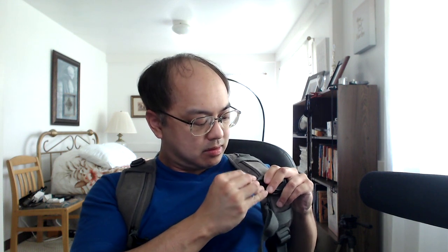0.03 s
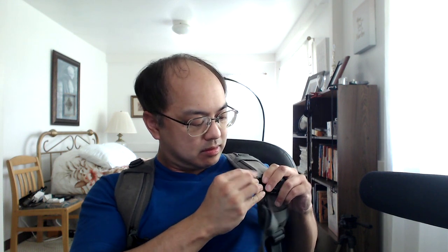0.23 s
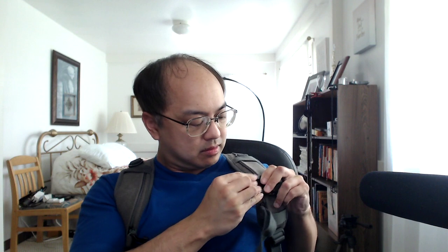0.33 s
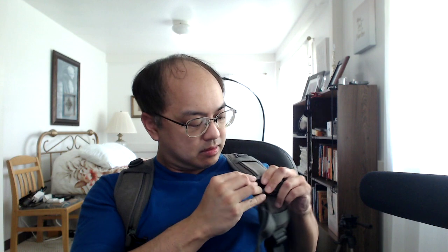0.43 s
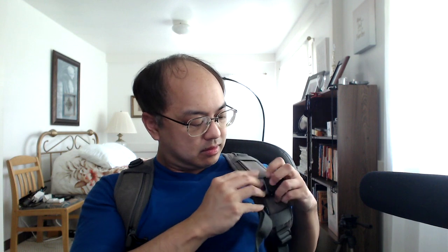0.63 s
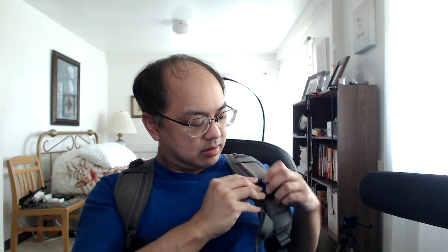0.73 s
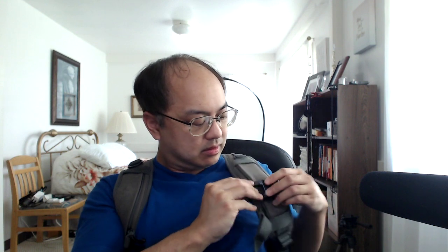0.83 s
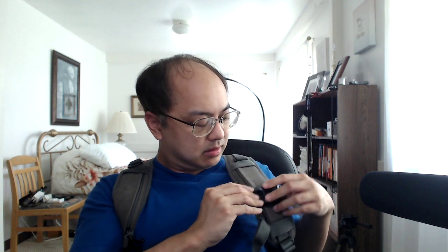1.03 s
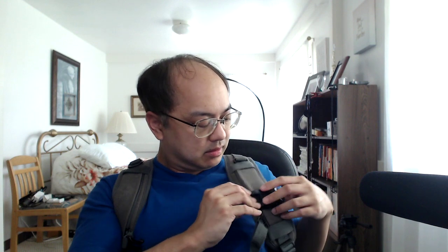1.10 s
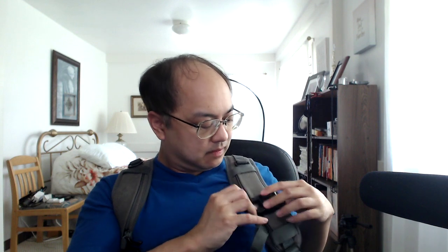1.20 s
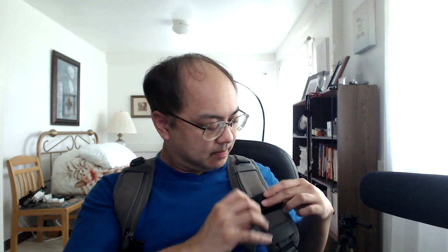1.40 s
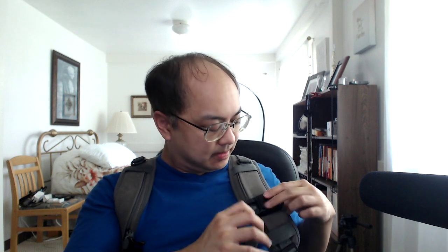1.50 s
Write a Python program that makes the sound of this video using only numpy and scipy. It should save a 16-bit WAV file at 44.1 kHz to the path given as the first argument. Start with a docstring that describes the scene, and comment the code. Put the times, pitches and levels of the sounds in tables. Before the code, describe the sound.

A plastic buckle on a backpack strap snaps shut with one sharp, loud click close to the microphone. Fingers then faintly rub, bump and tick against the strap in a small quiet room with a low hum.

```python
"""A plastic buckle on a backpack's shoulder strap snaps shut, close up, in a small quiet bedroom.
Its prongs slide, spring free and slap into their seats: five tight hits of crack, ring and thump
that overload the microphone and leave a short room tail. Fingers rub the webbing, bump the padded
strap and tick against the plastic, mostly after the snap. A low hum and soft hiss lie underneath."""
import sys
import numpy as np
from scipy import signal
from scipy.fft import rfft, irfft
from scipy.io import wavfile

SR = 44100
rng = np.random.default_rng(int(sys.argv[2]) if len(sys.argv) > 2 else 0)


def dump(signal):
    """Clip the signal to [-1, 1] and save it as 16-bit WAV at the path in sys.argv[1]."""
    limited = np.clip(np.atleast_2d(signal).T, -1, 1)
    pcm = np.round(limited * 32767).astype(np.int16)
    wavfile.write(sys.argv[1], SR, pcm)


N = 68355
T = np.arange(N) / SR

# level ride of the hum: t/s, level/dB
HUM_RIDE = [(0, -44), (.03, -49), (.07, -44.5), (.16, -47.5), (.28, -47), (.36, -42.5), (.46, -51.5),
            (.51, -43.5), (.57, -44.5), (.66, -48.5), (1.55, -47)]
# colour of the room tone's hiss: f/Hz, relative level/dB
AIR_COLOUR = [(20, 10), (55, 3), (140, 0.5), (260, -0.5), (450, -10.5), (700, -9), (1100, -13.5),
              (2000, -18.5), (5000, -22), (10000, -27.5), (15500, -34), (17000, -38)]
# the bedroom's decay times: f/Hz, t60/s
ROOM_DECAY = [(100, 0.84), (300, 0.32), (700, 0.22), (1800, 0.27), (4800, 0.26), (9000, 0.21),
              (15000, 0.21)]
# colour of the snap as it comes back from the walls: f/Hz, relative level/dB
WASH_COLOUR = [(60, -15), (140, 6.5), (250, 4), (420, 15.5), (700, 10), (1100, -0.5), (1400, 1), (2000, 4),
               (2900, 2.5), (3500, -2.5), (4500, 3.5), (5600, -4), (9200, 0.5), (11000, -3.5),
               (12300, -11.5), (15500, -10)]
# standing waves set off by the snap: f/Hz, level/dB, t60/s
STANDING_WAVES = [(143.7, -28, 0.24), (214.4, -36.5, 0.25), (276.7, -42.5, 0.46), (321, -39.5, 0.27),
                  (390, -31.5, 0.32), (479, -30.5, 0.11), (613, -37.5, 0.23), (963, -32, 0.13),
                  (1172, -37.5, 0.17), (1775, -39.5, 0.19), (1955, -42.5, 0.22), (2176, -39.5, .16),
                  (2910, -36.5, .12)]
# finger strokes on the webbing: peak t/s, rub level/dB, hiss level/dB, rise/s, fall/s
WEBBING_STROKES = [(0.029, -62, -66.5, 0.0087, 0.012), (.465, -65, -70, 0.023, 0.027),
                   (0.549, -60, -64.5, 0.032, 0.01), (0.59, -55.5, -60.5, 0.015, 0.02),
                   (0.721, -60, -66.5, 0.021, 0.03), (.80, -62, -71, 0.024, 0.026),
                   (0.875, -56.5, -63.5, 0.025, 0.012), (.95, -66.5, -72.5, 0.034, 0.034),
                   (1.14, -69.5, -69.5, 0.051, 0.067), (1.246, -70, -67.5, 0.043, 0.033),
                   (1.351, -68, -65.5, 0.018, 0.03), (1.47, -66.5, -79, 0.097, 0.13)]
# colour of a stroke's dull rub: f/Hz, relative level/dB
RUB_COLOUR = [(200, -0.5), (650, 7.5), (1100, -1), (1800, 6), (3200, -2), (5000, -7), (9000, -22.5),
              (16000, -44)]
# colour of a stroke's nylon hiss: f/Hz, relative level/dB
NYLON_COLOUR = [(1000, -22), (2500, -7.5), (4500, 2), (7000, -1.5), (10500, -2.5), (13000, -9),
                (16000, -10.5)]
# the weave catches and lets go: t/s, level/dB, f/Hz
WEAVE_CATCHES = [(0.617, -49, 3840), (0.6217, -52, 3800), (0.802, -55.5, 1650), (1.462, -60, 4340)]
# finger knocks on the padded strap: t/s, knock level/dB, f/Hz, t60/s, scuff level/dB
STRAP_BUMPS = [(.319, -44, 745, 0.025, -62), (.342, -45, 623, 0.042, -50), (0.4305, -39.5, 540, 0.015, -57),
               (.4357, -37, 669, 0.05, -44), (0.4417, -42, 660, 0.02, -49.5),
               (0.445, -27.5, 484, 0.011, -58), (.602, -41, 676, 0.02, -75), (1.281, -48, 503, 0.022, -60),
               (1.315, -42.5, 452, 0.027, -52), (1.329, -43, 550, 0.023, -52),
               (1.343, -41.5, 200, 0.033, -74.5), (1.4478, -39, 318, 0.024, -81),
               (1.4518, -28.5, 376, 0.018, -43.5), (1.483, -31, 316, 0.01, -53),
               (1.489, -29, 191, 0.033, -57), (1.502, -39.5, 342, 0.045, -63),
               (1.516, -36.5, 175, 0.031, -54), (1.533, -42.5, 280, 0.019, -65)]
# colour of a knock's scuff: f/Hz, relative level/dB
SCUFF_COLOUR = [(300, 6), (750, 4.5), (1300, 0.5), (2000, -2), (4000, -13.5), (8000, -24), (16000, -42)]
# fingernails and loose plastic tick against the buckle, and the prongs tick as they start to slide: t/s,
# level/dB, f/Hz
PLASTIC_TICKS = [(0.051, -41.5, 11100), (0.1755, -41.5, 5974), (0.1946, -30.5, 6300), (0.6044, -52, 3330),
                 (.7203, -41, 10500), (0.7297, -33, 3700), (0.7377, -42, 10000), (0.7377, -41, 4220),
                 (0.773, -47, 7000), (.9197, -49, 15000), (.9388, -48, 14500), (0.973, -43, 12500),
                 (1.139, -45, 4320), (1.3165, -51.5, 1750), (1.4514, -37, 1560), (1.4514, -45.5, 3600)]
# the prongs' hits: t/s, ring level/dB, tilt/(dB per octave), thump level/dB, thump f/Hz
PRONG_HITS = [(.19925, -12.7, -.6, -10.4, 887), (.20057, -.2, -1.4, .8, 611),
              (.20122, -6.3, -1.9, 4.5, 553), (.20513, 2, .8, -14.6, 939), (.20551, -6.2, -3.8, -9.1, 536)]
# the buckle's ringing modes: f/Hz, relative level/dB, t60/s
BUCKLE_MODES = [(1030, -3, 0.0047), (1577, -13, 0.0065), (1930, -7, 0.0084), (2304, -10, .0081),
                (2956, -11.5, 0.0053), (3720, -16, .008), (4090, -7, 0.0059), (6660, -15, .006),
                (8605, -9, .0042), (9390, -10.5, .0051), (10960, -10.5, .0036), (15327, -17, 0.004)]
# colour of a hit's crack: f/Hz, relative level/dB
CRACK_COLOUR = [(500, -30.5), (1400, 5.5), (2000, 4.5), (5600, -13), (9200, -0.5), (11000, -8.5),
                (12500, -17), (15500, -18)]


def from_db(db):
    """Decibels to gain."""
    return 10 ** (np.asarray(db) / 20)


def unit_rms(x):
    """Normalise to an rms of 1."""
    return x / np.sqrt(np.mean(x ** 2) + 1e-20)


def at_hz(curve, hz):
    """Read a curve on a log-frequency axis."""
    freqs, values = np.transpose(curve)
    return np.interp(np.log(np.maximum(hz, 1)), np.log(freqs), values)


def coloured(x, colour):
    """EQ a steady noise to a colour, at unit rms."""
    gain = from_db(at_hz(colour, np.fft.rfftfreq(N, 1 / SR)))
    return unit_rms(irfft(rfft(x) * gain, N))


def noise(colour):
    """Smooth noise of a given colour."""
    return coloured(rng.standard_normal(N), colour)


def burst(start, decay_s):
    """Envelope with an instant attack and an exponential decay."""
    return (T >= start) * np.exp(-np.maximum(T - start, 0) / decay_s)


def ring(start, hz, t60):
    """One struck mode: a decaying sine."""
    return burst(start, t60 / np.log(1000)) * np.sin(2 * np.pi * hz * (T - start))


def room_tone(hum_hz=89.8, upper_hz=144, fade_s=0.17):
    """The bed: a wavering low hum, a faint tone that fades in above it, and soft hiss."""
    phase = rng.uniform(0, 2 * np.pi, 2)
    ride = from_db(np.interp(T, *np.transpose(HUM_RIDE)))
    hum = ride * np.sin(2 * np.pi * hum_hz * T + phase[0])
    late_fade_in = np.clip(T / fade_s - 1, 0, 1)
    upper = from_db(-65) * late_fade_in * np.sin(2 * np.pi * upper_hz * T + phase[1])
    return np.sqrt(2) * (hum + upper) + from_db(-59) * noise(AIR_COLOUR)


def room_decay(x, start):
    """Shape a noise into a tail, each band dying away at the room's pace."""
    hz, spectrum = np.fft.rfftfreq(N, 1 / SR), rfft(x)
    edges = np.geomspace(40, 20000, 13)
    tail = np.zeros(N)
    for lo, hi in zip(edges, edges[1:]):
        band = irfft(spectrum * ((hz >= lo) & (hz < hi)), N)
        t60 = at_hz(ROOM_DECAY, np.sqrt(lo * hi))
        tail += band * burst(start, t60 / np.log(1000))
    return tail


def bedroom_reverb(x, wet_db=-12, predelay_s=0.0033):
    """The walls return a short diffuse reverb; wet signal only."""
    impulse = room_decay(rng.standard_normal(N), predelay_s)
    impulse /= np.sqrt(np.sum(impulse ** 2))
    return from_db(wet_db) * signal.fftconvolve(x, impulse)[:N]


def snap_tail(attack_s=0.0029, early_delay_s=0.01):
    """The snap fills the room with an even wash and a few standing waves."""
    first_hit, last_hit = PRONG_HITS[0][0], PRONG_HITS[-1][0]
    wash = from_db(-25.5) * room_decay(noise(WASH_COLOUR), first_hit)
    wash *= 1 - burst(first_hit, attack_s)
    # the nearest surfaces answer first and lift the front of the wash
    wash *= 1 + from_db(0.5) * burst(first_hit + early_delay_s, decay_s=0.005)
    waves = sum(from_db(db) * ring(last_hit, hz, t60) for hz, db, t60 in STANDING_WAVES)
    return wash + waves * (1 - burst(last_hit, attack_s))


def fibre_friction(colour, slips_per_s=6000, spread_db=3.5, smooth_gain=0.7):
    """Grainy texture: many tiny fibre slips of uneven size over smooth friction noise."""
    slips = (rng.random(N) < slips_per_s / SR) * rng.choice([-1, 1], N)
    sizes = from_db(spread_db * np.minimum(rng.exponential(1, N), 4))
    return coloured(unit_rms(slips * sizes) + smooth_gain * rng.standard_normal(N), colour)


def webbing_rustle():
    """Each finger stroke swells and fades, part dull rub and part nylon hiss."""
    peak, rub_db, hiss_db, rise, fall = np.transpose(WEBBING_STROKES)[:, :, None]
    swells = np.exp(-((T - peak) / np.where(T < peak, rise, fall)) ** 2)
    out = np.zeros(N)
    for colour, db in ((RUB_COLOUR, rub_db), (NYLON_COLOUR, hiss_db)):
        power = np.sum(from_db(db) ** 2 * swells, axis=0)
        out += fibre_friction(colour) * np.sqrt(power)
    return out


def weave_catches(width_hz=2100, fade_s=0.0015):
    """The weave snags and lets go in short band-passed scratches."""
    out = np.zeros(N)
    radius = np.exp(-np.pi * width_hz / SR)
    for peak, db, hz in WEAVE_CATCHES:
        bandpass = [1, 0, -1, 1, -2 * radius * np.cos(2 * np.pi * hz / SR), radius * radius]
        scratch = signal.sosfilt([bandpass, bandpass], rng.standard_normal(N))
        out += from_db(db) * unit_rms(scratch) * np.exp(-np.abs(T - peak) / fade_s)
    return out


def strap_bumps(attack_s=0.00062):
    """Dull finger knocks with a little scuff; the padding gives way and softens the attack."""
    out, grit = np.zeros(N), noise(SCUFF_COLOUR)
    for start, knock_db, hz, t60, scuff_db in STRAP_BUMPS:
        scuff = from_db(scuff_db) * grit * burst(start, decay_s=0.0035)
        knock = from_db(knock_db) * ring(start, hz, t60) * (1 - burst(start, attack_s))
        out += scuff - knock
    return out


def plastic_ticks(cycles=6.4):
    """Nails, loose plastic and the sliding prongs tap the buckle: crisp ticks, gone within a few cycles."""
    return sum(from_db(db) * ring(start, hz, t60=cycles / hz) for start, db, hz in PLASTIC_TICKS)


def buckle_snap(tilt_pivot_hz=4000, crack_vs_ring_db=-14):
    """Each prong hit rings the plastic with its own brightness, cracks, and jolts the buckle's body."""
    out, grit = np.zeros(N), noise(CRACK_COLOUR)
    for start, ring_db, tilt, thump_db, thump_hz in PRONG_HITS:
        for k, (hz, mode_db, t60) in enumerate(BUCKLE_MODES):
            gain = from_db(ring_db + mode_db + tilt * np.log2(hz / tilt_pivot_hz))
            out += (-1) ** k * gain * ring(start, hz, t60)   # modes alternate in polarity
        crack = from_db(ring_db + crack_vs_ring_db) * grit * burst(start, decay_s=0.001)
        thump = from_db(thump_db) * ring(start, thump_hz, t60=0.0093)   # damped by the hands
        out += crack - thump
    return out


def scene():
    """Mono mix: snap and handling up front, room tail and room tone behind."""
    hands = strap_bumps() + webbing_rustle() + weave_catches() + plastic_ticks()
    low_cut = signal.butter(2, 135, "high", fs=SR, output="sos")   # the close sounds carry little deep bass
    foreground = signal.sosfilt(low_cut, buckle_snap() + hands + bedroom_reverb(hands))
    return (foreground + snap_tail() + room_tone())[None]


def record(dry, ceiling=0.74):
    """The overloaded microphone soft-clips the snap; rumble and the very top are cut."""
    clipped = dry / (1 + (dry / ceiling) ** 6) ** (1 / 6)
    low_cut = signal.butter(2, 50, "high", fs=SR, output="sos")
    high_cut = signal.ellip(10, 0.1, 70, 16100, fs=SR, output="sos")
    return signal.sosfilt(high_cut, signal.sosfilt(low_cut, clipped))


dry = scene()
out = record(dry)
dump(out)
```